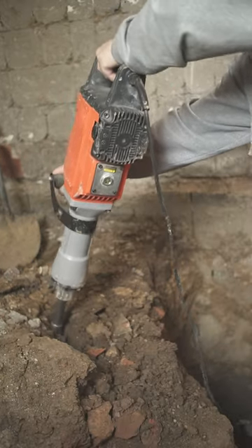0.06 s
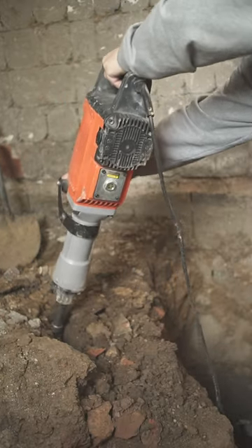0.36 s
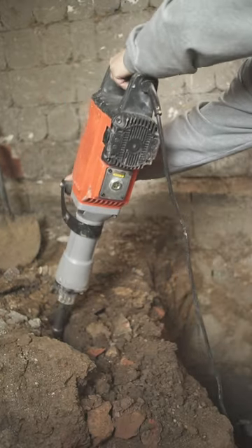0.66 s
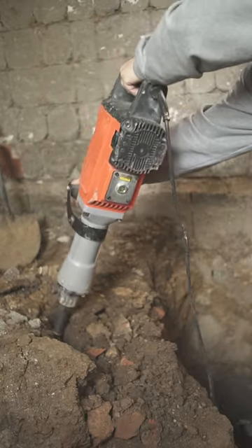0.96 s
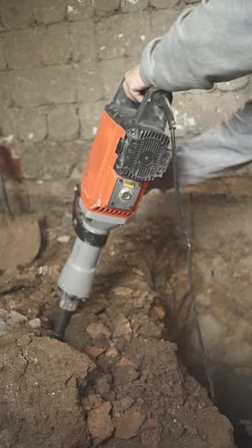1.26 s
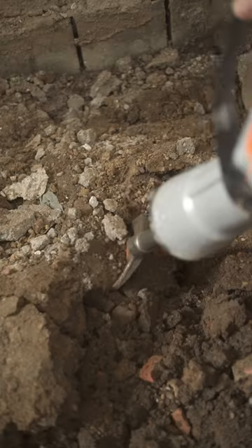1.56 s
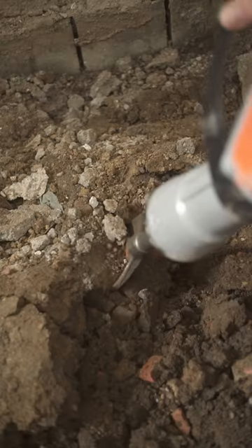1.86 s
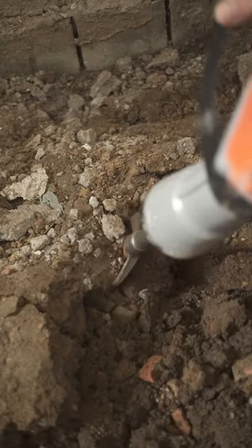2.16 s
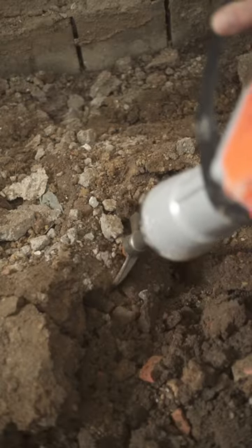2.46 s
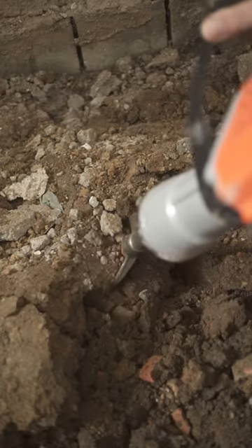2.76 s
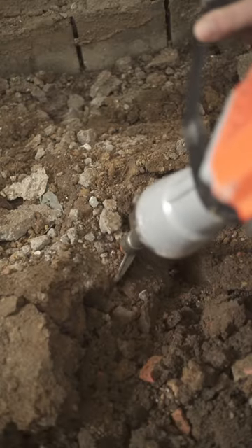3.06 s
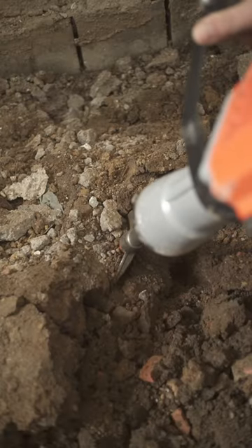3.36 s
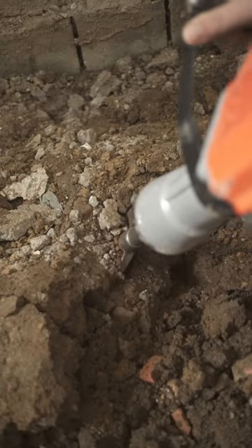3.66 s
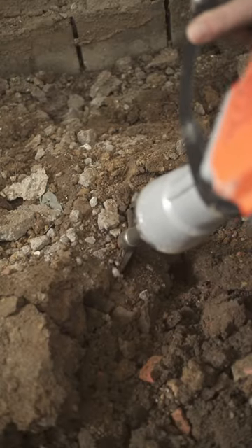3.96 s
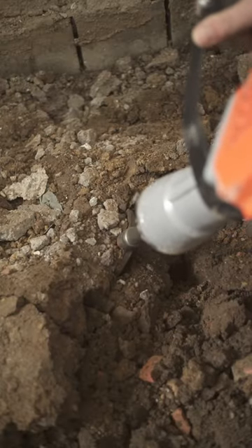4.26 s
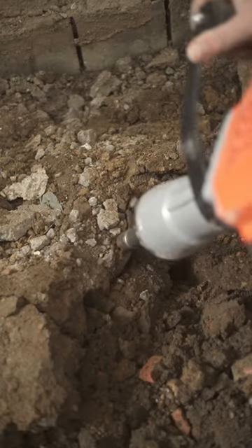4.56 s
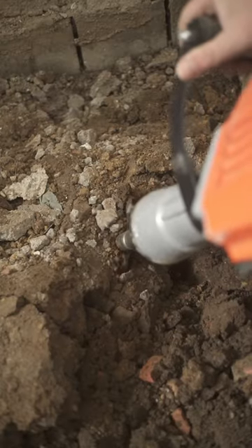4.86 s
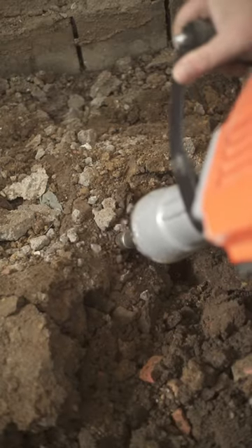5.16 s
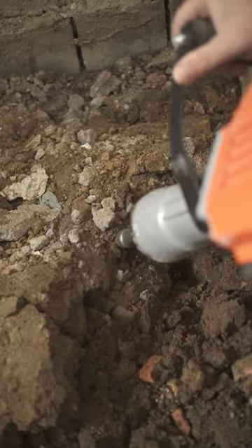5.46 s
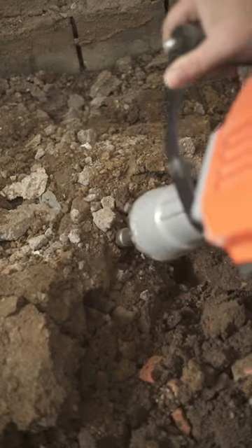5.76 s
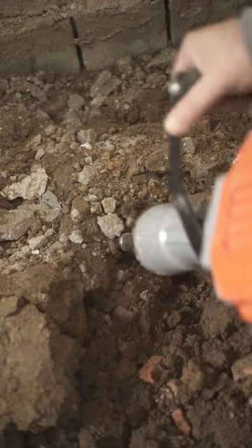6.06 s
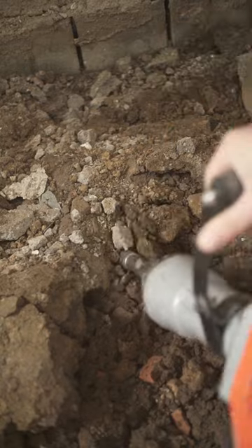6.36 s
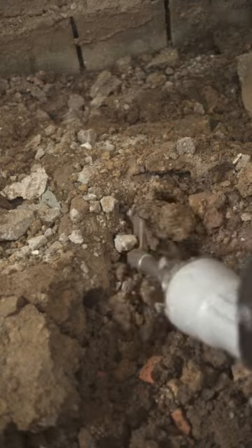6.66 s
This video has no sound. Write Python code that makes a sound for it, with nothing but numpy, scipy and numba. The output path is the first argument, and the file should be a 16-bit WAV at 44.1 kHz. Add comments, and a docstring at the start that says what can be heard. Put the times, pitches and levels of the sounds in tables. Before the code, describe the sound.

Fast, loud, steely pounding comes in several runs as an electric demolition hammer chisels into packed earth, with a short echo off a wall. The microphone starts a little way off and jumps in close, where the blows turn dry and sharp with crumbling grit. Finally the tool is lifted, the strikes cease, and the motor whirs up with a pulsing gear whine and a loose metal rattle.

```python
"""Beside a block wall, an electric demolition hammer breaks hard soil, two metres off, then close by.
Over the rush of its fan and the whine of its gears, a crank throws the striker on the chisel about
21 times a second: each blow cracks, rings the steel, shakes the housing and crumbles earth.
At the end a clod splits off and the chisel is lifted: the blows stop, the motor races, its gears
sing once a turn and the loose chisel squeaks and clatters."""
import sys
import numpy as np
from scipy import signal
from scipy.fft import rfft, irfft
from scipy.io import wavfile
from numba import njit

SR = 44100
rng = np.random.default_rng(int(sys.argv[2]) if len(sys.argv) > 2 else 0)


def file_out(sig):
    """Save sig as 16-bit WAV at sys.argv[1]."""
    # one column per channel
    cols = np.atleast_2d(sig).T
    # limit, then scale
    lim = np.clip(cols, -1, 1)
    pcm = np.round(lim * 32767).astype(np.int16)
    wavfile.write(sys.argv[1], SR, pcm)


N = 304290
T = np.arange(N) / SR
CLOSE_S, LIFT_S = 1.562, 6.14  # the listener is close from here on; the chisel is lifted clear
CLOSE, FREE = T > CLOSE_S, np.clip((T - LIFT_S) / 0.06, 0, 1)
SNAP, RIPPLE_DB = .4, 1.5  # extra amplitude at first contact; change of colour from blow to blow


def undb(db):
    """Decibels to gain."""
    return np.exp(np.asarray(db) * (np.log(10) / 20))


def unit(x):
    """Scaled to an rms of 1."""
    return x / np.sqrt(np.mean(x ** 2))


def curve(table):
    """Straight lines in time through (seconds, value) points."""
    return np.interp(T, *np.array(table).T)


def wander(rate):
    """Smooth chance with a spread near 1, drawn rate times a second."""
    knots = rng.standard_normal(N // 16)
    return np.interp(T * rate, np.arange(len(knots)), knots)


def rough_tone(hz, rough, rate):
    """A sine whose pitch trembles by the share rough."""
    cycles = np.cumsum(hz * (1 + rough * wander(rate))) / SR
    return np.sin(2 * np.pi * (cycles % 1))


def swell(centre_s, length_s):
    """A single bell-shaped rise and fall."""
    return np.exp(-(2 * (T - centre_s) / length_s) ** 2)


def once_a_turn(turns, centre, width):
    """A smooth opening at one point of every turn of the crank."""
    return np.exp(-.5 * (((turns - centre + .5) % 1 - .5) / width) ** 2)


def colour(x, table, column=1, size=4096):
    """Causal filter of unit power through the (Hz, dB) points of a table."""
    rows, hz = np.array(table), np.arange(size // 2 + 1) * SR / size
    gain = unit(undb(np.interp(np.log(hz + 1), np.log(rows[:, 0]), rows[:, column])))
    cepstrum = irfft(np.log(gain))
    cepstrum[1:size // 2] *= 2
    cepstrum[size // 2 + 1:] = 0
    return signal.oaconvolve(x, irfft(np.exp(rfft(cepstrum)))[None], axes=1)[:, :N]


def ring(x, modes, shift_db=0):
    """A bank of (Hz, width Hz, dB) resonances; each comes and goes by shift_db as the contact changes."""
    out = 0
    for hz, width, db in modes:
        strength = undb(db + shift_db * wander(8) if shift_db else db)
        out += strength * signal.lfilter(*signal.iirpeak(hz, hz / width, fs=SR), x + 1e-18)
    return out


def stereo(pair, side):
    """Left and right from a shared signal and a differing one; long waves reach both ears alike."""
    apart = signal.lfilter(*signal.butter(1, 1300, "high", fs=SR), pair[1] + 1e-18)
    return (pair[0] + side * np.array([[1], [-1]]) * apart) / np.sqrt(1 + side ** 2)


def walls(x, t60, gap_s):
    """Diffuse echo of the wall and the pit, different at each ear."""
    t = T[:SR // 3]
    tail = stereo(rng.standard_normal((2, len(t))), side=0.22) * undb(-60 * t / t60) * (t > gap_s)
    return signal.oaconvolve(x, tail / np.sqrt(np.sum(tail[0] ** 2)), axes=1)[:, :N]


def gripped_response(hz, modes, drift_db=.9, shift_widths=.22):
    """Response of the chisel at one blow: each resonance sits a little differently as the soil grips."""
    response = 1
    for centre, width, db in modes:
        louder, higher = rng.standard_normal(2)
        detuning = (hz ** 2 - (centre + shift_widths * width * higher) ** 2) / (width * (hz + 1))
        response += undb(3.5 + db + drift_db * louder) / (1 + 1j * detuning)
    return response


def bursts(events, hold_s, fade_s, memory, memory_hz, snap=0, ripple_db=0, modes=(), size=4096):
    """A dense shudder at each (s, dB); memory makes it resemble the one before, most in the bass."""
    t, hz = np.arange(size) / SR, np.arange(size // 2 + 1) * SR / size
    shape = np.exp(-np.maximum(t - hold_s, 0) / fade_s) * (1 + snap * np.exp(-t / .0008))
    keep = np.clip(memory, 0, .995) * np.exp(-hz / memory_hz)
    out, pattern = np.zeros((2, N + 2 * size)), rfft(rng.standard_normal((2, size)))
    knots_hz = np.arange(0, SR / 2, 900)
    for s, db in events:
        pattern = keep * pattern + np.sqrt(1 - keep ** 2) * rfft(rng.standard_normal((2, size)))
        spectrum = rfft(shape * irfft(pattern))
        tint = undb(ripple_db * np.interp(hz, knots_hz, rng.standard_normal(len(knots_hz))))
        # a hard blow excites the frequencies rather evenly: the steel mostly spreads them in time
        shudder = unit(shape ** .1 * irfft(tint * spectrum / np.abs(spectrum) ** .4))
        if len(modes):
            shudder = irfft(rfft(shudder) * gripped_response(hz, modes))
        start = int(np.clip(s * SR, 0, N))
        out[:, start:start + size] += undb(db) * shudder * np.sqrt(np.mean(shape ** 2))
    return out[:, :N]


@njit
def settle(speed, aim, lag_s):
    """A speed that eases toward its aim."""
    out = np.empty(len(aim))
    for i in range(len(aim)):
        speed += (aim[i] - speed) / (lag_s[i] * SR)
        out[i] = speed
    return out


# Spells of hammering. Each row: first blow in seconds, release in seconds,
# blows a second at the spell's start, easing to the loaded pace.
SPELLS = [(.0351, .262, 29.43), (.4288, 1.1, 31.26), (1.5986, 1.77, 20.8), (1.9246, 4.37, 30.17),
          (4.4886, 6.16, 32.14)]
# The pace that the soil's resistance allows. Each row: time in seconds, crank turns a second.
LOADED_SPEED = [(.25, 20.55), (.55, 20.46), (.68, 21.24), (1.05, 20.14), (1.7, 19.86), (2, 20.86),
                (2.36, 20.17), (2.44, 22.39), (2.56, 20.57), (3.4, 21.234), (4.3, 20.216), (4.6, 21.025),
                (5.2, 20.927), (5.85, 20.45), (6.1, 21.44)]
def crank(start_speed=25, free_speed=29.82, spin_up_s=.26, sag_s=.052):
    """The motor sags when pressed and races when released; turns count from each spell's first blow."""
    aim, lag_s = np.full(N, free_speed), np.full(N, spin_up_s)
    turns, pressed = start_speed * (T - SPELLS[0][0]), np.zeros(N)
    for start, release, opening_rate in SPELLS:
        since, spell = T >= start, (T >= start) & (T < release)
        aim[spell], lag_s[spell], pressed[spell] = curve(LOADED_SPEED)[spell], sag_s, 1
        turns[since] = np.cumsum(settle(opening_rate, aim[since], lag_s[since])) / SR
    return settle(float(start_speed), aim, lag_s), turns, pressed


# Level ride of the fan and brush noise. Each row: time in seconds, level in dB.
RUSH_LEVEL = [(0, -36.5), (.6, -37.5), (1.17, -41), (1.28, -36), (1.4, -37), (1.56, -42), (3.5, -46),
              (6.05, -46), (6.3, -49.5), (6.9, -45)]
# Tone of that noise. Each row: frequency in Hz, gain from afar in dB, gain close by in dB.
RUSH_EQ = [(40, -39, -30), (111, -20, -36), (265, -17, -12), (523, -2.5, -6), (835, -1, -1),
           (1450, 1.5, -1), (1900, 5, 2), (3000, 6.5, 3.5), (4430, 1.5, 1), (5800, 1.5, 1),
           (7340, -2.5, -2), (11800, -12.5, -9.5), (15500, -13, -16)]
# Tone of the gearbox running free. Each row: frequency in Hz, gain in dB.
GEARBOX_EQ = [(60, -79), (200, -35), (330, -14), (500, -7.5), (750, -3.5), (1050, -7), (1350, 1.5),
              (1520, -1.5), (2200, 3.5), (2700, 4), (3250, 2.5), (3800, 3.5), (4400, 2), (5200, -1.5),
              (6000, -1.5), (6700, -4), (7800, -6.5), (9400, -2), (10500, -11), (15500, -19)]
def fan_rush(turns, close_db=10.5):
    """Fan and brushes rush, swelling once a turn; after the lift they take on the gearbox's tone."""
    air = stereo(rng.standard_normal((2, N)), side=0.58)
    flutter_db = 2 * wander(350) + 2 * once_a_turn(turns, 0.89, 0.092)
    air *= undb(curve(RUSH_LEVEL) + close_db * CLOSE + flutter_db)
    working = np.where(CLOSE, colour(air, RUSH_EQ, column=2), colour(air, RUSH_EQ, column=1))
    return working * (1 - FREE) + FREE * colour(air, GEARBOX_EQ)


# Level ride of the gear whine. Each row: time in seconds, level in dB.
WHINE_LEVEL = [(0, -52), (.2, -64), (.41, -47), (.54, -58), (1.5, -69), (2.2, -54), (3.2, -48), (3.7, -50),
               (4.4, -53), (4.9, -49.5), (5.4, -49.5), (6.0, -45), (6.2, -47)]
TEETH, BARS = 72.7, 528  # gear teeth and commutator bars that pass in one turn of the crank
def motor_whine(speed, turns, pressed):
    """The gears whine and, close by, the commutator whistles; both sway with the load of the piston."""
    swaying = speed * (1 + 0.05 * np.sin(2 * np.pi * (turns - .35)) * pressed)
    strain_db = 14 * CLOSE * pressed * once_a_turn(turns, 0.833, 0.042)  # the compression stroke
    level = undb(curve(WHINE_LEVEL) + strain_db + 4.6 * wander(200))
    whine = level * rough_tone(TEETH * swaying, rough=0.0365, rate=600)
    whistle = undb(-51) * CLOSE * rough_tone(BARS * swaying, rough=0.00345, rate=620)
    return whine + whistle


# Brief swells of the gear case. Each row: centre in seconds, length in seconds, level in dB.
CASE_SWELLS = [(0, 0.081, -38), (0.403, 0.16, -40.5)]
def case_ring(hz=1830):
    """The gear case rings while the unloaded motor passes its resonance."""
    level = sum(undb(db) * swell(s, length) for s, length, db in CASE_SWELLS)
    return level * rough_tone(hz, rough=0.027, rate=600)


# A faint bed of hum. Each row: pitch as a multiple of the crank's speed, level in dB.
HUM_PARTIALS = [(24, -57), (40, -58)]
def armature_hum(speed):
    """Armature and fan hum at a pitch that follows the motor."""
    return sum(undb(db) * rough_tone(order * speed, rough=0.0201, rate=150) for order, db in HUM_PARTIALS)


# How hard each spell hits. Each row: opening level in dB, change in dB a second, first-blow offset in dB.
SPELL_FORCE = [(-19, -20, 0), (-21, -0.5, -1), (-16.5, -16, -0.5), (-17, -1, -0.5), (-18.5, -0.5, -2)]
# Stray hits between spells, the chisel barely pressed. Each row: start in seconds, level in dB.
STRAY_BLOWS = [(1.278, -21.5), (1.3398, -25), (1.4147, -25.5), (1.5064, -23), (1.8015, -25.5),
               (1.8402, -27.5), (1.883, -26)]
def striker(turns, scatter_db=.35):
    """All blows as (s, dB): one at each whole turn while the chisel is pressed, and the strays."""
    blows = list(STRAY_BLOWS)
    for (start, release, _), (db, db_per_s, first_db) in zip(SPELLS, SPELL_FORCE):
        spell = (T >= start) & (T < release)
        times = np.interp(np.arange(turns[spell][-1]), turns[spell], T[spell])
        levels = db + db_per_s * (times - start) + first_db * (times == times[0])
        blows += zip(times, levels + scatter_db * rng.standard_normal(len(times)))
    return sorted(blows)


# Tone of the crack. Each row: frequency in Hz, gain in dB from afar, close and bare, close and buried.
CRACK_EQ = [(150.0, -54, -38, -49), (360, -20.5, -23, -15), (745, -8, -2, -4.5), (1050, -8, -3.5, -17),
            (1330, 0, -1.5, -4.5), (1980, -0.5, 0.5, -5.5), (2120, 2.5, -2.5, -3.5), (2840, 2.5, 5.5, -5.5),
            (3280, -1, 3.5, -9), (4940, 1.5, 3.5, -5.5), (6070, 3.5, -1.5, -1), (6950, -4, 0.5, -3.5),
            (11400, -3, -2, -3.5), (14900, -9.5, -5.5, -15)]
# The bright ring of chisel and barrel. Each row: pitch in Hz, width in Hz, gain in dB.
STEEL_MODES = [(2700, 560, 2), (3590, 290, 6.5), (4900, 130, 1), (5300, 130, 1), (5850, 90, 1.5),
               (6230, 58, 2.5), (8400, 69, 0.5), (9360, 120, -9), (14440, 150, 4)]
def far_blows(all_blows):
    """From two metres a blow is a short clank, its slap off the ground and a wash of steel and echo."""
    blows = [b for b in all_blows if b[0] < CLOSE_S]
    hit = bursts(blows, 0.0014, 0.0033, memory=0.59, memory_hz=60000, snap=SNAP, ripple_db=RIPPLE_DB)
    hit = stereo(hit, side=0.18)
    clank = colour(hit + undb(-4) * ring(hit, STEEL_MODES, shift_db=3.5), CRACK_EQ)
    wash = bursts(blows, hold_s=0.0086, fade_s=0.027, memory=0.78, memory_hz=25000)
    wash = colour(stereo(wash, side=0.82), CRACK_EQ)
    tremor = bursts(blows, hold_s=0.0017, fade_s=.024, memory=0.85, memory_hz=30000, ripple_db=RIPPLE_DB)
    steel = ring(stereo(tremor, side=0.98), STEEL_MODES, shift_db=3)
    reflected = np.roll(clank[::-1], int(.0056 * SR), axis=1)
    slap = colour(reflected, [(500, -30), (3000, -4), (6000, -0.5), (15000, -1)])
    echo = walls(clank, t60=0.2, gap_s=0.011)
    return undb(-3.5) * clank + undb(-8.5) * slap + undb(-9) * wash + undb(-3) * steel + undb(-6) * echo


# The thud of housing and ground. Each row: frequency in Hz, gain from afar in dB, gain close by in dB.
THUD_EQ = [(29.8, -32, -45), (69.5, -15, -24), (110, -6, -20.5), (162, -25, -19), (190, 2, -10.5),
           (247, -4, 5), (258, -2, -1.5), (365, 1, 0.5), (424, -18, -22), (499, 15.5, 1), (653, -5, 0),
           (1010, -20, -13), (2500, -30, -29)]
def recoil(blows, half_turn_s=.024):
    """Blows shake housing and ground, the piston pulls back half a turn later, and loose soil rumbles."""
    kick = stereo(bursts(blows, hold_s=0.004, fade_s=0.011, memory=1, memory_hz=12200), side=0.39)
    shake = kick - undb(-6) * np.roll(kick, int(half_turn_s * SR), axis=1)
    far = undb(-31) * colour(shake, THUD_EQ, column=1)
    near = undb(-28.5) * colour(shake, THUD_EQ, column=2)
    middle, apart = bursts(blows, hold_s=0.018, fade_s=0.03, memory=0, memory_hz=1000)
    soil = middle + .4 * np.array([[1], [-1]]) * apart
    rumble = colour(soil, [(20, 6.5), (35, 4), (60, -16), (120, -29), (300, -25), (1000, -65)])
    return np.where(CLOSE, near, far) + undb(-45.5) * rumble


def crumbs(blows, grains_per_s=700, spread_db=2.5, fade_s=0.035):
    """Grit cracks and trickles round the chisel for as long as the blows keep coming."""
    times, levels = np.array(blows).T
    last = np.maximum(np.searchsorted(times, T) - 1, 0)
    drive = undb(levels[last]) * np.exp(-np.abs(T - times[last]) / fade_s) * (T > times[0])
    sizes = undb(spread_db * np.minimum(rng.exponential(size=(2, N)), 4)) * rng.standard_normal((2, N))
    grains = sizes * (rng.random((2, N)) < grains_per_s / SR)
    grit = stereo(unit(walls(grains, t60=0.02, gap_s=0)), side=1)
    return undb(-12.5) * drive * colour(grit, [(300, -29), (2000, -3.5), (6000, 6), (11000, 8), (15500, 3)])


# Bright steel accents. Each row: start in seconds, pitch in Hz, level in dB, fade in seconds.
PINGS = [(.073, 2560, -23, 0.0092), (.258, 4680, -30, .012), (0.427, 3600, -23.5, 0.013),
         (0.465, 2580, -43, 0.011), (.55, 2450, -32, .009), (1.0778, 2570, -20, 0.0046),
         (1.28, 2490, -26, 0.0085), (1.28, 6230, -26, 0.012), (1.414, 3530, -23, 0.008),
         (1.926, 8750, -31, 0.028), (4.607, 5900, -25, 0.0086), (5.951, 1586, -23, 0.009)]
def chisel_pings(attack_s=0.0012):
    """A single mode pings when a blow leaves the chisel free to ring."""
    out = np.zeros(N)
    for s, hz, db, fade_s in PINGS:
        envelope = np.clip((T - s) / attack_s, 0, 1) * np.exp(-np.abs(T - s) / fade_s)
        out += undb(db) * envelope * rough_tone(hz, rough=0.0121, rate=370)
    return out


# Level ride of the gear chirp. Each row: time in seconds, level in dB.
CHIRP_LEVEL = [(1.6, -25.5), (2.7, -28), (3.1, -31), (3.7, -30.5), (4.5, -40), (5.1, -33), (6.0, -37)]
def gear_chirp(turns, pressed, hz=3130, at_turn=.832):
    """The gear whine's octave chirps near 3 kHz just before each blow, falling in pitch."""
    octave = rough_tone(hz * (1 - .13 * np.sin(2 * np.pi * (turns - at_turn))), rough=.016, rate=1100)
    gate = CLOSE * np.maximum(pressed, T < SPELLS[2][0]) * once_a_turn(turns, at_turn, 0.032)
    return gate * undb(curve(CHIRP_LEVEL) + 4 * wander(300)) * octave


# Colour of the close crack, chisel bare and buried. Each row: pitch in Hz, width in Hz, gain in dB.
BARE_MODES = [(1050, 115, 0.5), (1384, 69, 3), (1595, 90, 1.5), (2480, 140, -9), (2890, 150, -11),
              (3810, 250, -8), (4640, 150, 0), (5950, 590, 2.5), (6170, 220, -1.5), (7450, 440, -5),
              (8640, 700, -7), (14000, 410, 0)]
BURIED_MODES = [(1374, 140, 2), (1580, 130, 3), (2240, 470, 6.5), (3700, 170, 1), (4190, 320, 9.5),
                (5070, 240, -10), (6360, 240, -17), (8500, 330, -7), (11800, 440, -4), (14150, 490, 8.5)]
# Its ringing tail: shank while bare, barrel once buried. Each row: pitch in Hz, width in Hz, gain in dB.
SHANK_MODES = [(4680, 110, -3), (5850, 130, 2.5), (6020, 110, -2), (8650, 330, 0), (11600, 540, -7)]
BARREL_MODES = [(1450, 56, 2), (1620, 64, 1), (3830, 60, 2), (5860, 110, -8), (11500, 600, 0)]
def near_blows(all_blows, sink_at_s=4.5, sinking_s=.35):
    """Close by a blow is a knock, a dry crack and a faint ring; its colour changes as the chisel sinks."""
    blows = [b for b in all_blows if b[0] > CLOSE_S]
    sunk = np.clip((T - sink_at_s) / sinking_s, 0, 1)
    bare_gain, buried_gain = np.sqrt(1 - sunk), np.sqrt(sunk)
    attack = dict(snap=SNAP, ripple_db=RIPPLE_DB)
    bare = bursts(blows, 0.003, 0.0018, memory=0.8, memory_hz=35000, modes=BARE_MODES, **attack)
    buried = bursts(blows, 0.0021, 0.0022, memory=0.87, memory_hz=25000, modes=BURIED_MODES, **attack)
    crack = undb(-5) * colour(stereo(bare, side=0.48) * bare_gain, CRACK_EQ, column=2)
    crack += undb(-6) * colour(stereo(buried, side=0.36) * buried_gain, CRACK_EQ, column=3)
    contact = bursts(blows, hold_s=0.00075, fade_s=0.00033, memory=0.884, memory_hz=50000)
    knock_eq = [(300, -27), (1100, -10.5), (1400, 2), (2400, -4.5), (3300, -8.5), (15000, -46)]
    knock = colour(stereo(contact, side=0.23), knock_eq)
    tremor = stereo(bursts(blows, hold_s=0.002, fade_s=0.048, memory=0.69, memory_hz=30000), side=0.58)
    steel = ring(tremor, SHANK_MODES, shift_db=3.5) * bare_gain
    steel += undb(-2) * ring(tremor, BARREL_MODES, shift_db=2.5) * buried_gain
    return crack + undb(-8.5) * knock + undb(-9) * steel + undb(-10) * walls(crack, t60=0.35, gap_s=0.012)


# Ticks after a close blow. Each row: delay in seconds, pitch in Hz, level against the blow in dB.
BOUNCES = [(0.0164, 3790, -12.5), (0.0169, 2320, -19.5), (.019, 6170, -18), (0.0228, 2220, -16),
           (.026, 4720, -25), (.029, 5870, -14), (.033, 2810, -15.5)]
def bounces(all_blows, fade_s=0.0017, jitter_s=.0008, scatter_db=3, size=1024):
    """After a short lull the chisel chatters back in its holder, in nearly the same pattern every turn."""
    blows = [b for b in all_blows if b[0] > CLOSE_S]
    t, ticks = np.arange(size) / SR, np.zeros(N + size)
    for s, blow_db in blows:
        for delay_s, hz, db in BOUNCES:
            later, louder, higher = rng.standard_normal(3)
            start = int((s + delay_s + jitter_s * later) * SR)
            tick = np.exp(-t / fade_s) * np.sin(2 * np.pi * hz * (1 + 0.017 * higher) * t)
            ticks[start:start + size] += undb(blow_db + db + scatter_db * louder) * tick
    ticks = np.array([ticks[:N]] * 2)
    rebounds = [(s + .014, db) for s, db in blows]
    chatter = bursts(rebounds, hold_s=0.017, fade_s=0.0063, memory=0.91, memory_hz=30000)
    chatter = colour(stereo(chatter, side=1), CRACK_EQ, column=2)
    return ticks + undb(-1) * walls(ticks, t60=0.054, gap_s=0.001) + undb(-15.5) * chatter


# Raspy squeaks. Each row: centre in seconds, length in seconds, pitch in Hz, level in dB.
SQUEAKS = [(6.147, 0.063, 2960, -34.5), (6.2, 0.032, 3200, -32.5), (6.309, 0.022, 4420, -30),
           (6.352, 0.029, 6700, -33), (6.384, 0.035, 4400, -32)]
def shank_squeaks():
    """The shank squeaks unevenly as it slides out."""
    slip = unit(undb(6 * wander(250)))
    return slip * sum(undb(db) * swell(s, length) * rough_tone(hz, rough=.065, rate=1100)
                      for s, length, hz, db in SQUEAKS)


def clod(db=-27):
    """The last blow splits off a clod with a dull knock."""
    knock = bursts([(LIFT_S, db)], hold_s=0.0036, fade_s=0.0043, memory=0, memory_hz=1000)
    earth_eq = [(150, -33), (500, -13), (900, 6), (1400, -3), (2500, 2), (5000, -26), (15000, -44)]
    return colour(stereo(knock, side=0.22), earth_eq)


def gear_song(speed, turns, rise_db_per_s=18.5, at_turn=0.13, overtone=3.17):
    """Unloaded, the gears sing and scrape in one burst a turn, ever louder, with a shrill overtone."""
    lifted_s = np.maximum(T - LIFT_S, 0)
    gate = np.clip(lifted_s / 0.11, 0, 1) ** 2 * np.tanh(2 * once_a_turn(turns, at_turn, 0.1))
    level = undb(-43.5 + rise_db_per_s * lifted_s + 1.5 * wander(400)) * gate
    mesh_hz = TEETH * speed * (1 - 0.026 * np.sin(2 * np.pi * (turns - at_turn)))
    rasp = 1 + .55 * rough_tone(mesh_hz / 5.5, rough=.12, rate=300)  # the pinion runs out of true
    hoarse = .02 + .025 * np.exp(-lifted_s / .2)  # steadies once the motor has gathered speed
    song = undb(7) * rasp * rough_tone(mesh_hz, rough=hoarse, rate=700)
    shrill = undb(-18 + 29 * lifted_s) * rasp * rough_tone(overtone * mesh_hz, rough=.018, rate=220)
    scrape = rasp * stereo(rng.standard_normal((2, N)), side=0.73)
    casing = unit(ring(scrape, [(2450, 380, -7), (3980, 400, 1), (6700, 750, 5)]))
    return level * (song + shrill + undb(1.5) * colour(scrape, GEARBOX_EQ) + undb(-2.5) * casing)


# The hard knocks in the clatter. Each row: start in seconds, relative level in dB.
CLACKS = [(6.2005, -30), (6.2387, -22), (6.256, -20), (6.2731, -25), (6.3056, -19), (6.335, -18.5),
          (6.345, -19.5), (6.3832, -19), (6.39, -30), (6.4108, -22), (6.4477, -21.5), (6.4625, -21),
          (6.487, -21), (6.5204, -28), (6.5295, -25), (6.6015, -20), (6.6365, -21.5), (6.6802, -39),
          (6.697, -25), (6.7071, -17), (6.7331, -22), (6.7414, -21), (6.7665, -17), (6.8019, -17),
          (6.81, -20), (6.836, -19), (6.844, -16.5), (6.8505, -22), (6.8706, -17), (6.879, -26)]
def loose_clatter(knocks_per_s=85, count=66, rise_db_per_s=6, scatter_db=4):
    """The lifted chisel knocks in its holder over a quick, uneven rattle that grows as the motor races."""
    later, louder = rng.standard_normal((count, 2)).T
    after_s = (1 + np.arange(count) + 0.33 * later) / knocks_per_s
    rattle = list(zip(LIFT_S + after_s, -30.5 + rise_db_per_s * after_s + scatter_db * louder))
    hits = sorted(CLACKS + rattle)
    knocks = bursts(hits, hold_s=0.0025, fade_s=0.0007, memory=0.67, memory_hz=30000, ripple_db=RIPPLE_DB)
    knocks = stereo(knocks, side=0.33)
    steel = ring(knocks, [(2210, 330, -0.5), (4350, 240, -5), (6700, 1100, 5)])
    return undb(-8) * colour(knocks + steel, GEARBOX_EQ)


# Pan of the tool's treble. Each row: time in seconds, left minus right in dB.
PAN = [(0, 2.5), (1.5, 1.5), (1.6, 4), (3.8, 3.5), (6.05, 2), (6.38, -2.7)]
def scene():
    """The whole tool, drifting from left to right as it is lifted; only short waves favour one ear."""
    speed, turns, pressed = crank()
    blows = striker(turns)
    pressed_blows = [b for b in blows if b not in STRAY_BLOWS]
    tool = far_blows(blows) + near_blows(blows)
    notes = np.array([chisel_pings() + shank_squeaks()] * 2)
    tool += notes + undb(-9) * walls(notes, t60=0.12, gap_s=0.0013)
    tool += recoil(pressed_blows) + bounces(pressed_blows) + crumbs(blows) + clod() + fan_rush(turns)
    motor = motor_whine(speed, turns, pressed) + gear_chirp(turns, pressed)
    motor += case_ring() + armature_hum(speed)
    motor = np.array([motor] * 2) * (1 - FREE)
    tool += motor + undb(-11.5) * walls(motor, t60=0.18, gap_s=0.00112)
    free_run = gear_song(speed, turns) + loose_clatter()
    tool += free_run + undb(-9.5) * walls(free_run, t60=0.13, gap_s=0.0062)
    bass, pan_db = signal.lfilter(*signal.butter(1, 1100, fs=SR), tool), curve(PAN)
    return bass + (tool - bass) * undb(np.array([pan_db, -pan_db]) / 2)


def record(dry, ceiling=0.47, low_hz=115, top_hz=15850):
    """Rounds the loudest peaks, thins the deepest bass and cuts the top."""
    rounded = ceiling * np.tanh(dry / ceiling)
    thin = signal.sosfilt(signal.butter(2, low_hz, "high", fs=SR, output="sos"), rounded)
    return signal.sosfilt(signal.ellip(10, .2, 70, top_hz, fs=SR, output="sos"), thin)


dry = scene()
out = record(dry)
file_out(out)
```